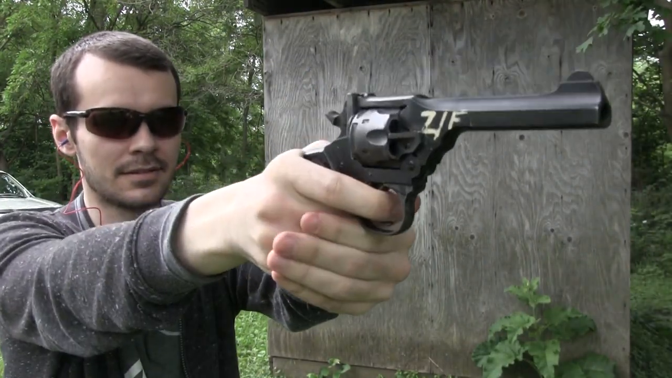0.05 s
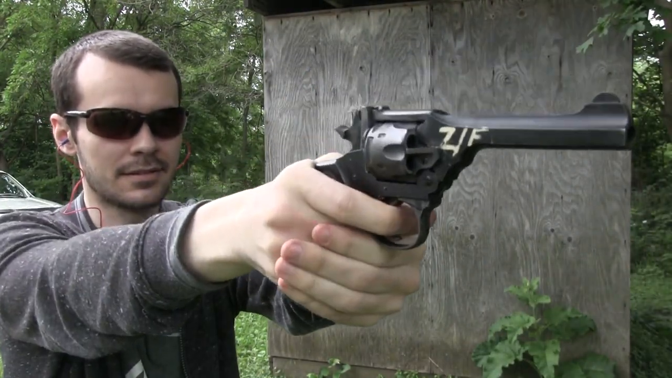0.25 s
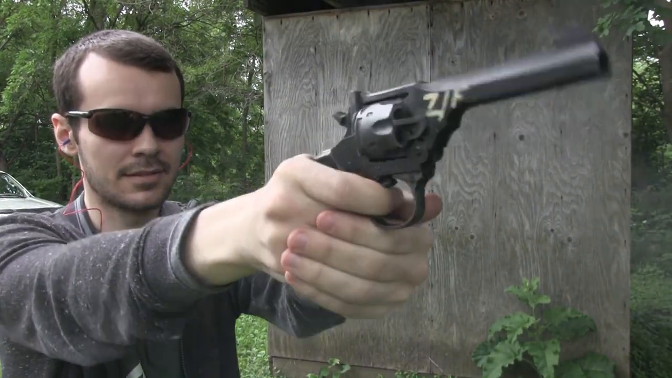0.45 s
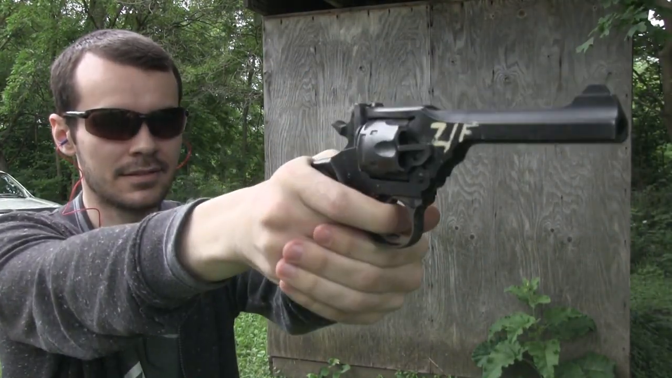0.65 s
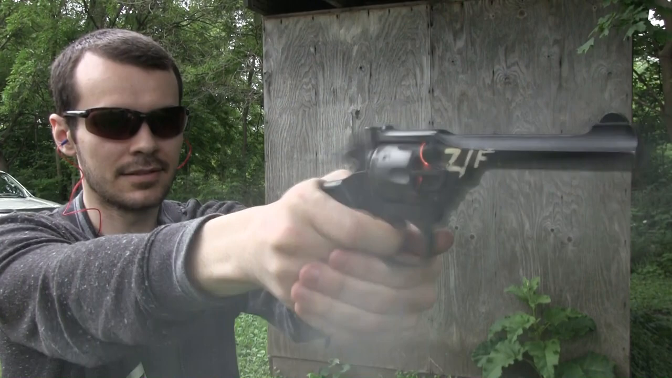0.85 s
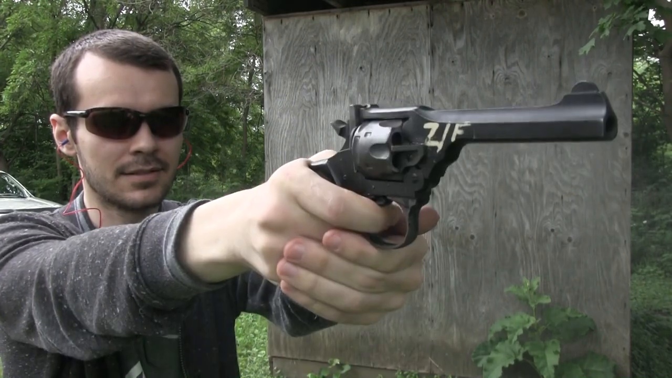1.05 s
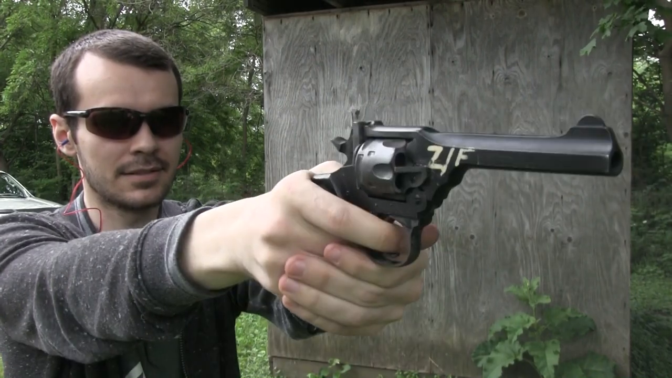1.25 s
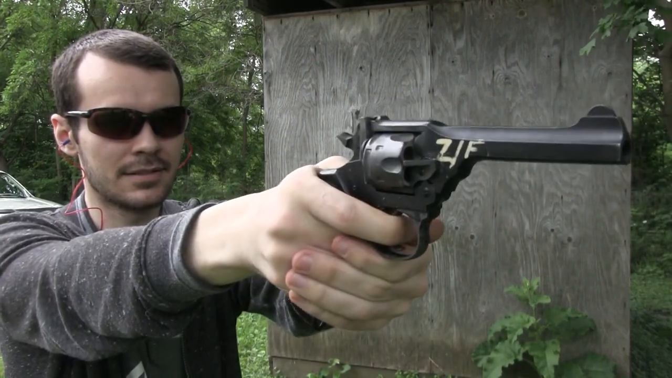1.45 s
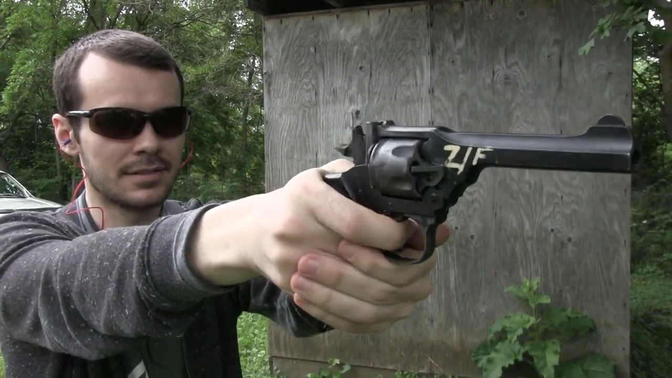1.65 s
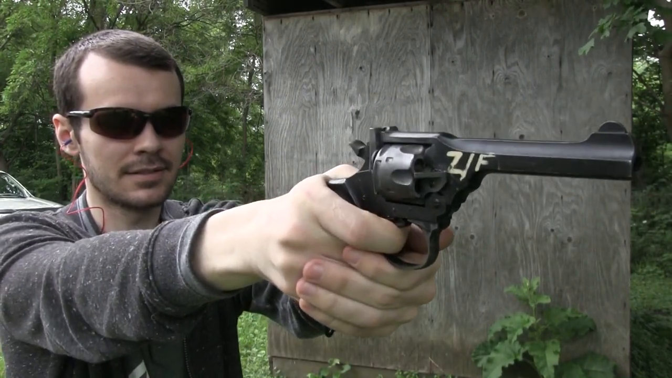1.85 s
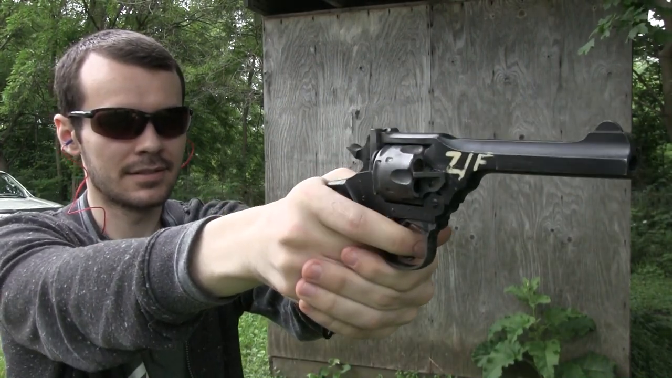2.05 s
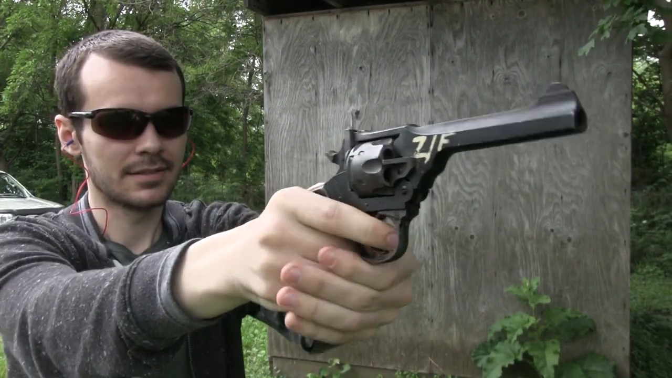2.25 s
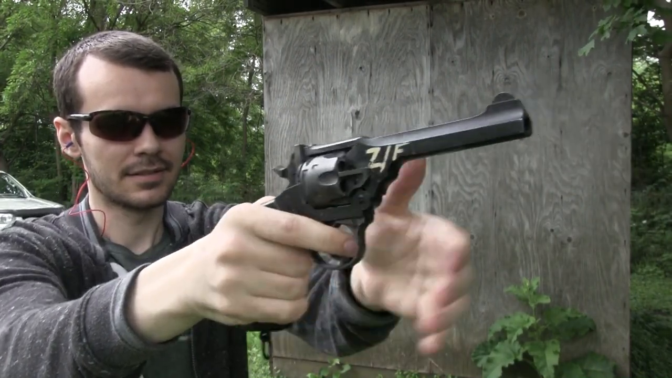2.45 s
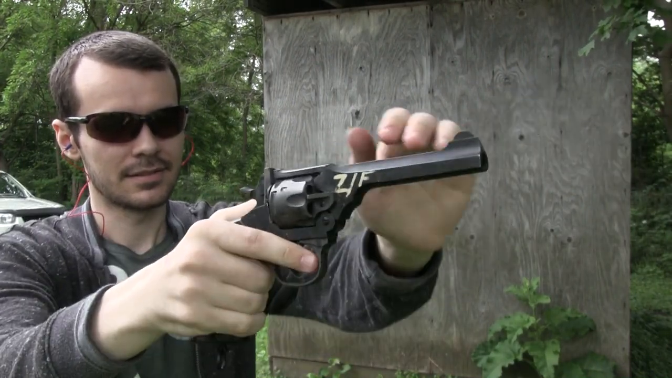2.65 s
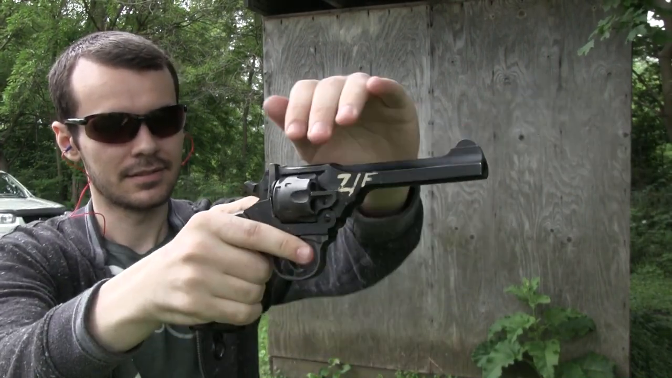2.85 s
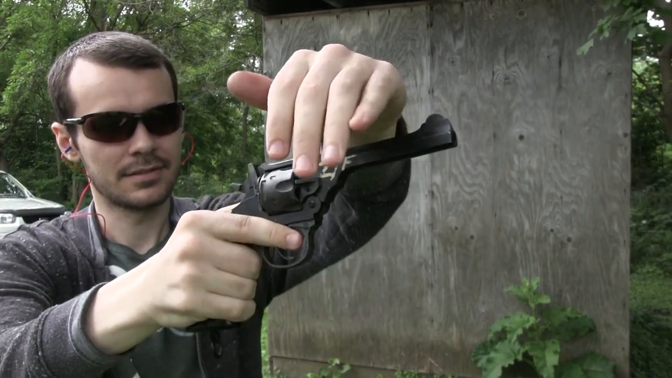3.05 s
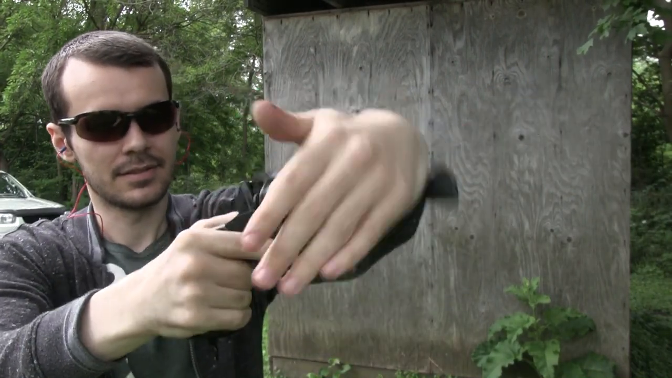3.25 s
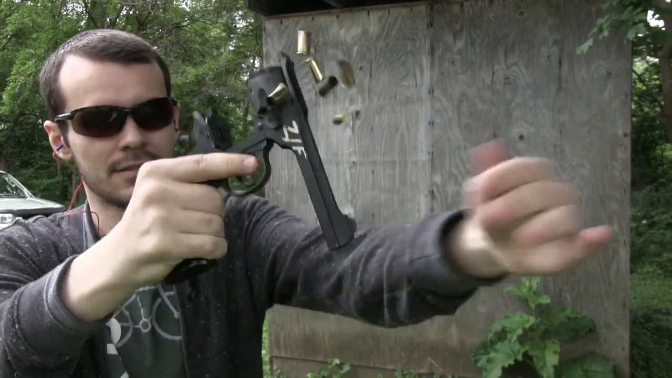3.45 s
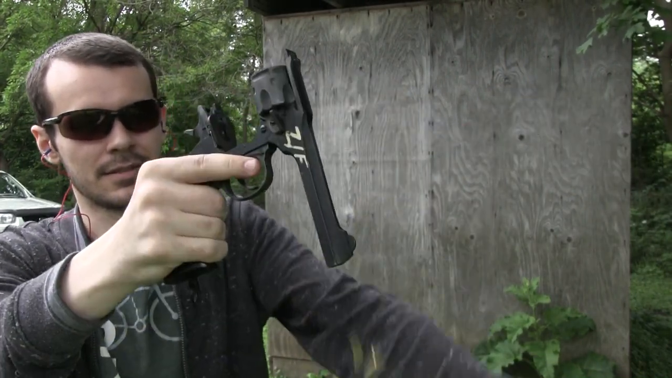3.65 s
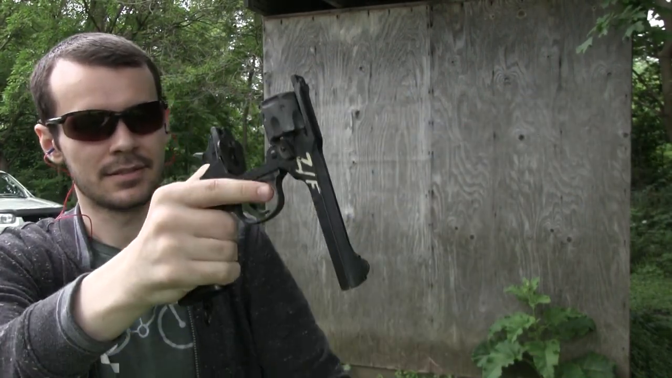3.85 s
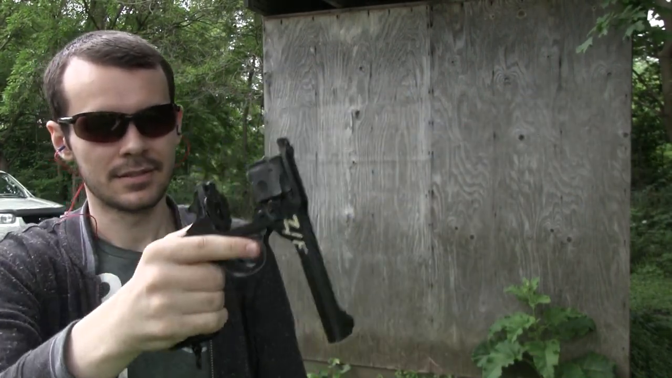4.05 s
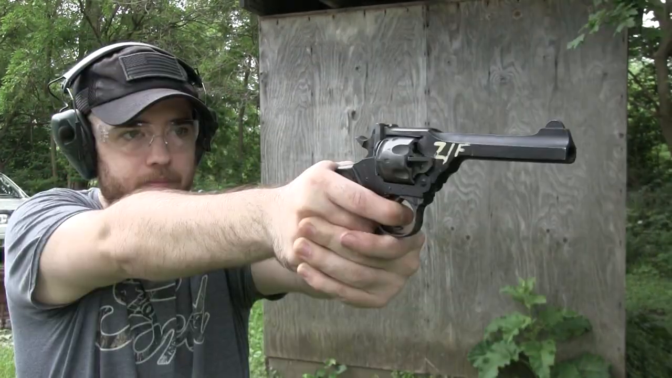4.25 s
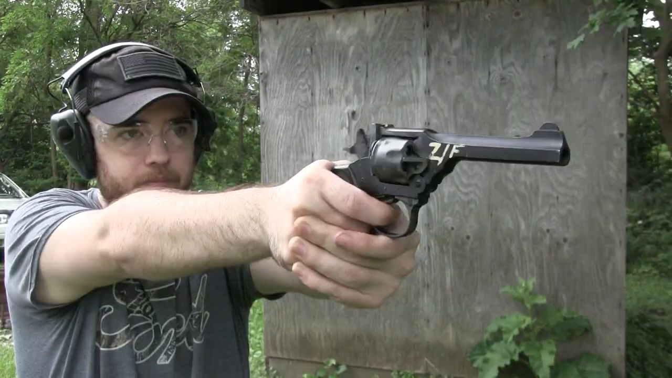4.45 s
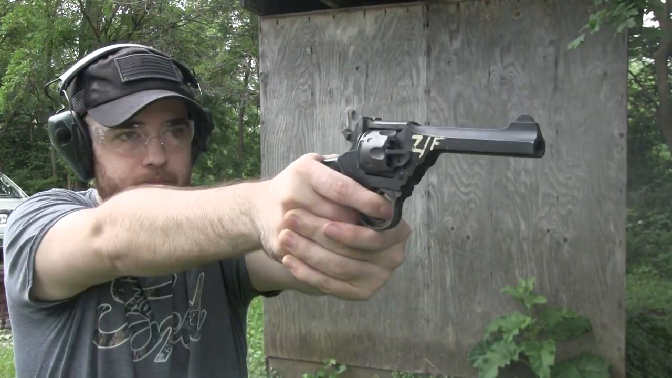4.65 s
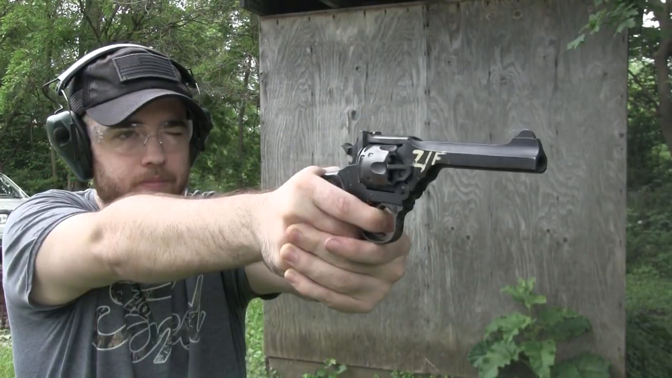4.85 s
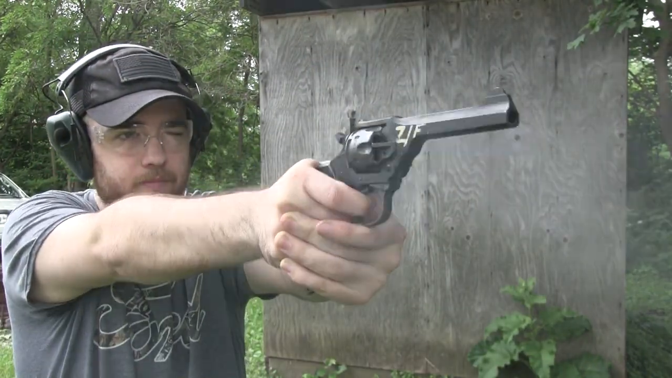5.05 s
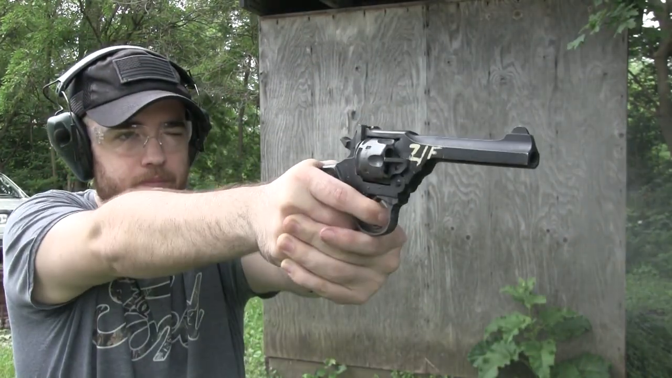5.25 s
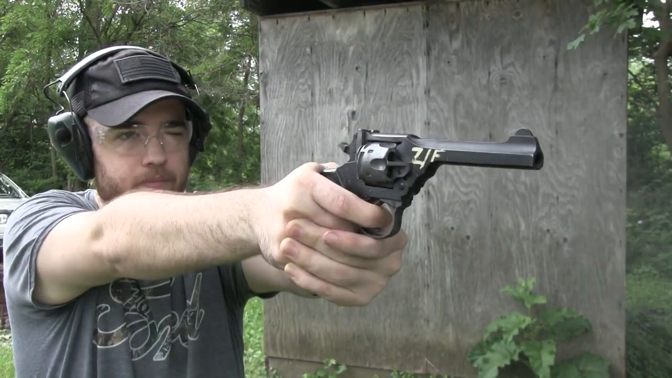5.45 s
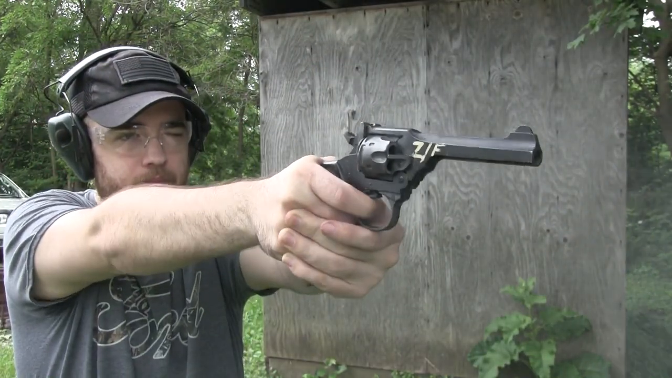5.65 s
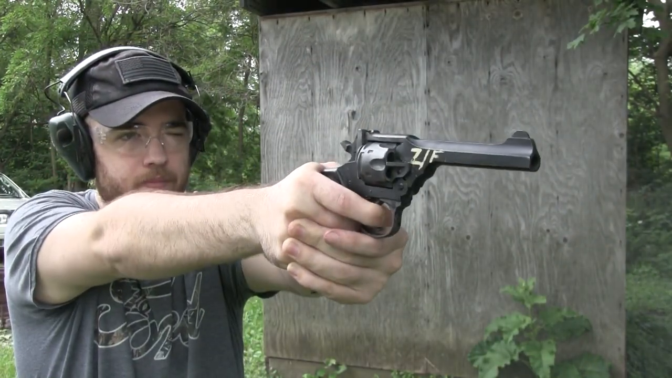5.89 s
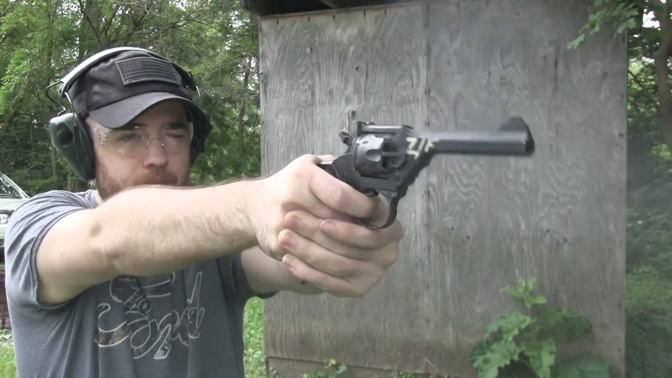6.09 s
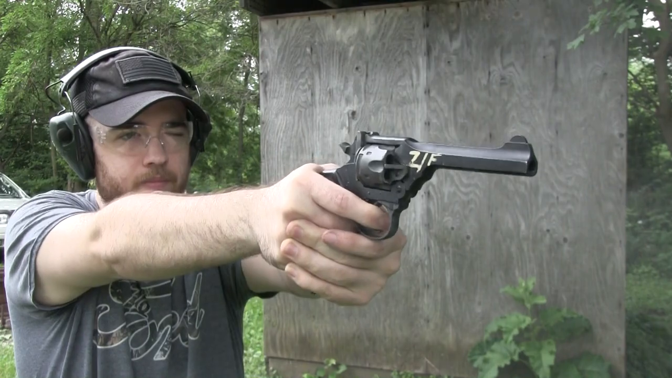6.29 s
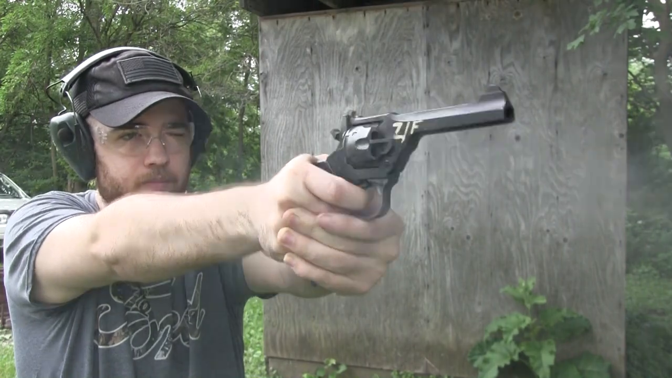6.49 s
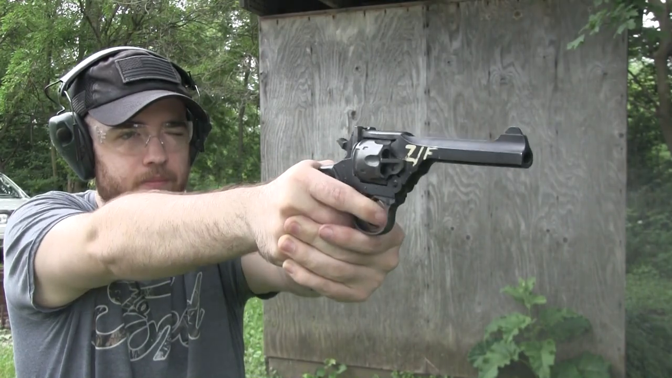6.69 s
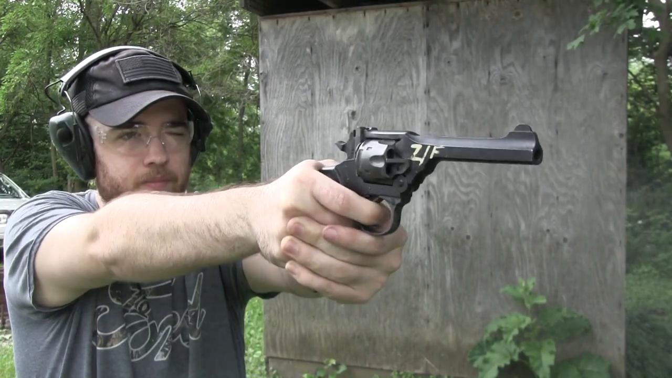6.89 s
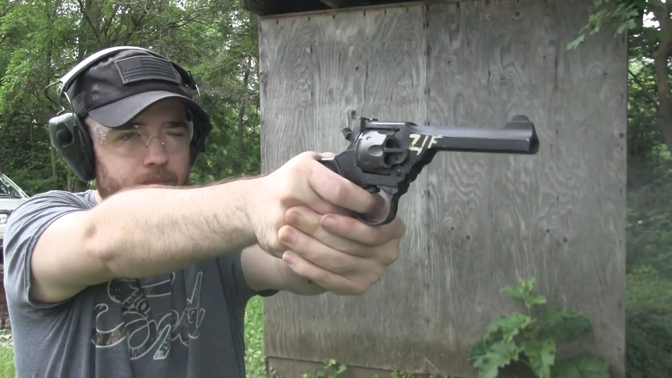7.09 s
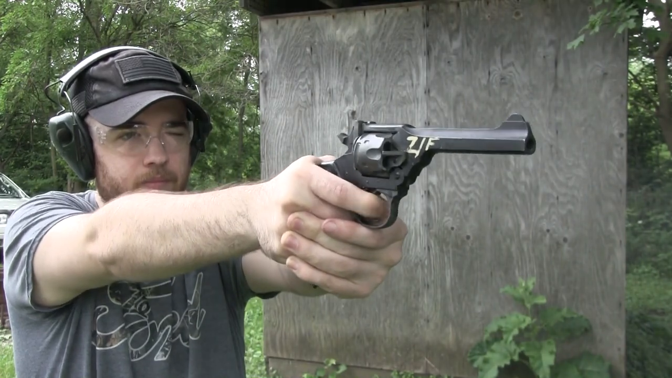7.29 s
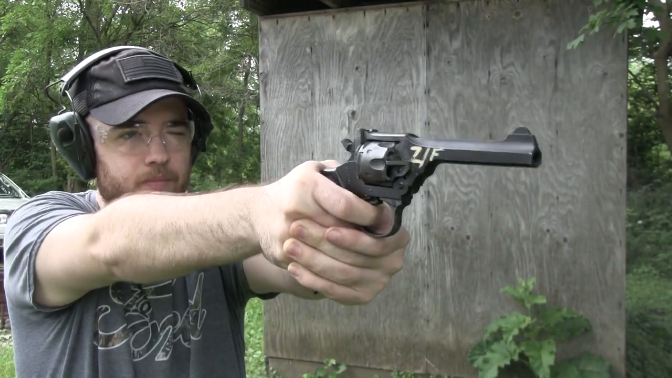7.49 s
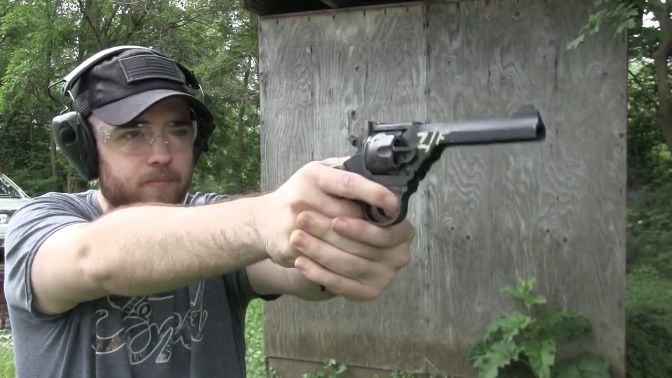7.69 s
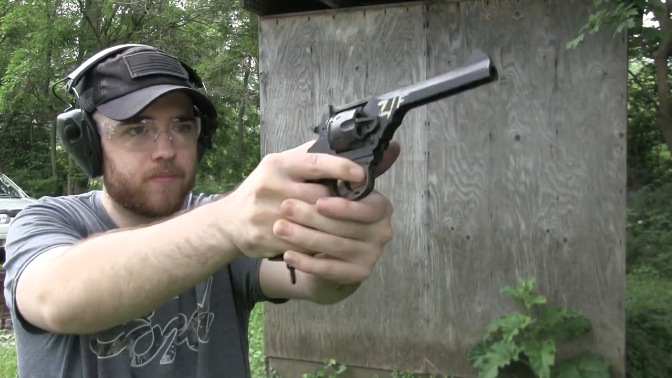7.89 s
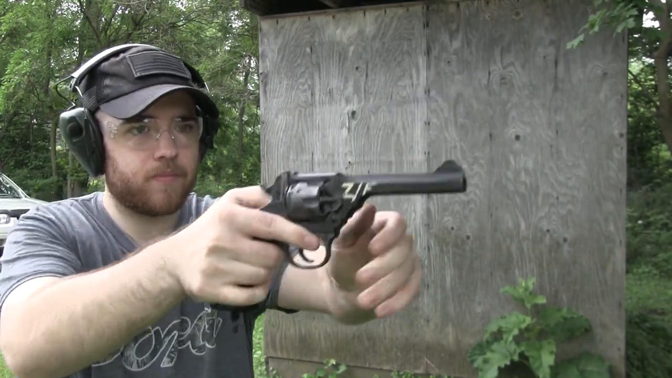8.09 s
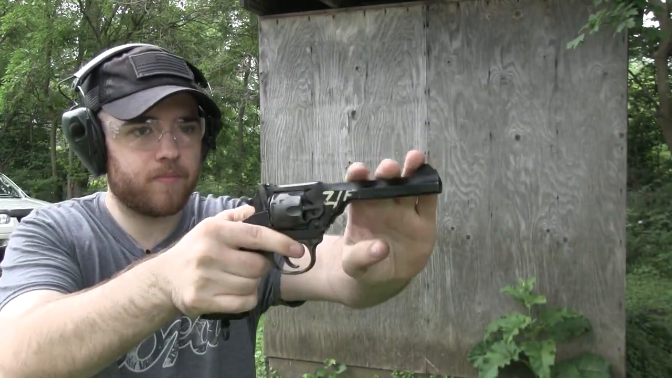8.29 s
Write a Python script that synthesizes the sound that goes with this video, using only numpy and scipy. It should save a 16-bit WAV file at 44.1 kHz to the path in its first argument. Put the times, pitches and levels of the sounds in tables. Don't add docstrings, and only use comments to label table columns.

```python
import sys
import numpy as np
from scipy import signal
from scipy.fft import rfft, irfft
from scipy.io import wavfile
from scipy.ndimage import uniform_filter1d

SR = 44100
rng = np.random.default_rng(int(sys.argv[2]) if len(sys.argv) > 2 else 0)


def how_loud(loudness_db):
    steps = np.asarray(loudness_db, float) / 20
    return 10 ** steps


def master(y):
    cut = np.clip(np.atleast_2d(y).T, -1, 1)
    pcm = np.round(cut * 32767)
    wavfile.write(sys.argv[1], SR, pcm.astype(np.int16))


N = 367345
LEAD_S = .005


def at_hz(points, hz):
    f, v = np.transpose(points)
    return np.interp(np.log(hz), np.log(f), v)


def bandpass(x, order, low_hz, high_hz):
    return signal.sosfilt(signal.butter(order, [low_hz, high_hz], "band", fs=SR, output="sos"), x)


def bands(white):
    edges_hz = 60 * 2 ** np.arange(0, 8.4, .5)
    for k, (low_hz, high_hz) in enumerate(zip(edges_hz, edges_hz[1:])):
        yield np.sqrt(low_hz * high_hz), bandpass(white[k % 2], 2, low_hz, high_hz)


def shaped(spectrum, size):
    hz = np.maximum(np.arange(size // 2 + 1) * SR / size, 10)
    noise = irfft(rfft(rng.standard_normal(size)) * how_loud(at_hz(spectrum, hz)), size)
    return noise / noise.std()


def ringing(hz, t60_s, length_s):
    t = np.arange(round(length_s * SR)) / SR
    return np.sin(2 * np.pi * hz * t) * how_loud(-60 * t / t60_s)


def add(out, sound, start_s):
    i = round(start_s * SR)
    part = sound[max(-i, 0):max(len(out) - i, 0)]
    out[max(i, 0):max(i, 0) + len(part)] += part


def air():
    # frequency in Hz, level in dB per Hz.
    spectrum = [(12, -38), (20, -3), (103, -5), (200, -18), (421, -21.5), (1500, -24.5), (14800, -28.5),
                (17000, -29.5)]
    return how_loud(-66.5) * shaped(spectrum, size=N)


def fall(hz, t, clumped, burst, woods, leaves, jets, front_s, rise_s, valley_db, valley_t60_s, far_db):
    # frequency in Hz, level in dB.
    valley_colour = [(220, -30), (330, -24), (480, -6), (900, -1), (2000, 2.5), (2500, -11.5), (4000, -24),
                     (14000, -58.5)]
    # frequency in Hz, level in dB.
    jet_colour = [(220, -29), (1500, -10), (4500, 2.5), (14000, -6.5)]
    jet_t60_s, far_t60_s, clump_db = .008, 4.5, 3

    db, held_s, t60_s = (at_hz([(row[0], row[k]) for row in burst], hz) for k in (1, 2, 3))
    blast = how_loud(db - 60 * np.maximum(t - front_s - held_s, 0) / t60_s)

    colour_db, drift_db = (at_hz([(row[0], row[k]) for row in leaves], hz) for k in (1, 2))
    trunks = how_loud(np.interp(t, *np.transpose(woods)) + colour_db + drift_db * t)

    near_slopes = how_loud(valley_db + clump_db * clumped - 60 * t / valley_t60_s)
    far_slopes = how_loud(far_db - 60 * t / far_t60_s)
    valley = how_loud(at_hz(valley_colour, hz)) * (near_slopes + far_slopes)

    gate = how_loud(40 * np.minimum((t - front_s) / rise_s, 0))
    jet = 0
    for s, jet_db in jets:
        jet = jet + (t > s) * how_loud(jet_db + at_hz(jet_colour, hz) - 60 * (t - s) / jet_t60_s)
    return np.sqrt(gate ** 2 * (blast ** 2 + trunks ** 2 + valley ** 2) + jet ** 2)


def clumps(banks, white, t):
    out = np.zeros_like(white)
    for delay_s, db, length_s, hz in banks:
        band = bandpass(white[:, t < delay_s + length_s], 3, hz / 1.42, hz * 1.428)
        swell = band[:, -round(2 * length_s * SR):]
        end, size = band.shape[1], swell.shape[1]
        out[:, end - size:end] += how_loud(db) * swell / band.std() * np.hanning(size)
    return out


def shots(events, slaps, banks, alike, scatter_db, slap_db, push_db, push_hz, **stand):
    # frequency in Hz, level in dB per Hz.
    blast = [(53, -27), (90, -5.5), (427, -8.5), (1900, -14), (3430, -10), (5090, -10.5), (12800, -25),
             (17000, -48.5)]
    air_loss_hz = 14400
    t = np.arange(round(2.2 * SR)) / SR - LEAD_S

    white = np.sqrt(alike) * rng.standard_normal((2, 1, len(t)))
    white = white + np.sqrt(1 - alike) * rng.standard_normal((2, len(events), len(t)))
    clumped = uniform_filter1d(uniform_filter1d(rng.standard_normal(len(t)), size=250), size=250)
    clumped /= clumped.std()

    tails = 0
    for hz, band in bands(white):
        tails = tails + band * how_loud(scatter_db + at_hz(blast, hz)) * fall(hz, t, clumped, **stand)
    tails = signal.sosfilt(signal.butter(2, air_loss_hz, fs=SR, output="sos"), tails)
    tails = tails + clumps(banks, white[0], t)

    fronts = np.zeros(len(t))
    for delay_s, db, length_ms, sign in slaps:
        u = np.linspace(-1, 1, max(round(length_ms * SR / 1000), 4))
        add(fronts, sign * how_loud(db + slap_db) * -np.sin(np.pi * u), delay_s + LEAD_S)
    add(fronts, how_loud(push_db) * ringing(push_hz, .11, .3), .004 + LEAD_S)

    out = np.zeros(N)
    for (s, db), tail in zip(events, tails):
        add(out, how_loud(db) * (tail + fronts), s - LEAD_S)
    return out


def first_string():
    # time in seconds, peak in dB.
    events = [
        (-.35, -5),
        (.484, -6),
        (.9525, -6),
    ]
    # delay in seconds, level in dB, length in ms, signed gain.
    slaps = [(-.0006, 3.5, 1.3, 0.68), (-.0002, -1.5, 2.1, -1), (.0042, -3.5, 1.4, 1),
             (0.0203, -4, 1.3, -1), (0.0221, 3, 1.7, 1)]
    # delay in seconds, level in dB, length in seconds, centre in Hz.
    banks = [(0.113, -19, .012, 1610), (0.146, -21.5, 0.034, 1440), (0.193, -34, 0.016, 716),
             (.3, -41, 0.018, 1630), (0.348, -32, 0.043, 1595), (.54, -40.5, 0.076, 750),
             (0.553, -36.5, .08, 1500), (1.06, -58, 0.15, 1600)]
    # frequency in Hz, level in dB, hold in seconds, T60 in seconds.
    burst = [(100, 4.5, 0.013, .09), (300, -0.5, .012, .09), (1500, 4, .023, .13), (4500, -4.5, .012, .2),
             (14000, 0, .022, .1)]
    # delay in seconds, scatter level in dB.
    woods = [(0, -11.5), (.085, -10), (.151, -8.5), (.198, -15), (.3, -24.5), (.39, -31.5), (.65, -42),
             (1.2, -67.5), (2.2, -83)]
    # frequency in Hz, level in dB, drift in dB per second.
    leaves = [(220, -12, 15.5), (1500, 4, 0.3), (4500, -1.06, 1.6), (9000, 3, -14), (14000, -2.5, -20)]
    # delay in seconds, level in dB.
    jets = [(-.0003, -10)]
    return shots(events, slaps, banks, alike=0.4, scatter_db=6.0, slap_db=-6.0, push_db=-6, push_hz=59.3,
                 burst=burst, woods=woods, leaves=leaves, jets=jets, front_s=-.0003, rise_s=0.00044,
                 valley_db=-12.5, valley_t60_s=1.69, far_db=-31.5)


def ticks():
    # time in seconds, peak in dB, centre in Hz.
    trigger = [(.453, -48, 5040), (0.471, -35, 9500), (.946, -44, 8000), (1.805, -40, 10000),
               (2.1205, -49, 10900), (4.525, -55, 2290), (7.507, -22, 5200), (7.93, -58, 8000),
               (8.01, -58, 10000), (8.065, -53, 5000), (8.092, -57, 4200), (8.195, -54, 10700)]
    reload = [(3.052, -51.5, 6400), (3.341, -42.5, 6350), (3.341, -52, 2000), (3.367, -43, 1200),
              (3.368, -44, 5000), (3.385, -48, 2200), (3.4235, -35, 5000), (3.436, -43, 4500),
              (3.449, -45, 5000), (3.456, -49, 2120), (3.457, -46, 4500), (3.465, -55, 4800),
              (3.472, -55, 4600), (3.481, -54, 5000), (3.5, -52, 4800), (3.489, -54, 2800),
              (3.49, -48, 9000), (3.512, -45, 11000), (3.917, -51.5, 2600), (4.075, -54, 2500),
              (4.096, -50, 2500), (4.122, -48.5, 2500)]
    bounces = [(1.8152, -28, 9000), (1.8175, -35, 6000), (1.8315, -29, 8000), (2.1255, -40, 9500),
               (2.1285, -50, 9000), (2.144, -52, 6000), (3.4325, -41, 6000), (7.493, -37.5, 2200),
               (7.5025, -24, 9000), (7.506, -36, 9000), (7.696, -33, 8950), (7.701, -47, 7950),
               (.479, -46, 5980)]
    out, t = np.zeros(N), np.arange(round(0.09 * SR)) / SR
    for s, db, hz in trigger + reload + bounces:
        rattle = shaped([(hz / 4, -16), (hz, 0), (hz * 2.5, -16)], size=len(t))
        add(out, how_loud(db - 4 - 60 * t / 0.0098) * rattle, s)
    return out


def clacks():
    # time in seconds, peak in dB, push in dB, body tone in Hz, sharpness 0-1.
    blows = [
        (1.8098, -20.5, -9, 9800, 1),
        (2.1227, -33.5, -6, 6100, 0),
        (3.427, -23, -9.5, 8440, 0.64),
        (7.4957, -12.5, -16, 2820, 0.3),
        (7.499, -10.5, -18, 5120, 1),
        (7.6995, -22.5, -13.5, 2820, 0.2),
    ]
    # frequency in Hz, level in dB per Hz.
    steel = [(400, -39), (1000, 4), (2000, -3.5), (3000, 0), (5000, 0.5), (10000, -3.5), (15000, -13),
             (17000, -23)]
    # frequency in Hz, level in dB per Hz.
    twigs = [(1000, -24), (2500, -7), (5000, 0), (9500, -1.5), (13000, -6.5), (17000, -6.5)]
    move_s, hedge_db, suction_db = 3.0, 7.5, -8
    out, t = np.zeros(N), np.arange(round(.4 * SR)) / SR
    for s, db, push_db, body_hz, sharp in blows:
        shape = np.minimum(t / .001, 1) ** 2 * how_loud(-60 * np.maximum(t - .001, 0) / .008)
        body = np.sin(2 * np.pi * body_hz * t)
        sound = shape * (how_loud(-7.5) * shaped(steel, size=len(t)) + how_loud(-5) * body)

        near_leaves = how_loud(-17 - 60 * t / 0.032)
        hedge = how_loud(-32 + hedge_db * (s < move_s) - 60 * t / .33)
        sound += shaped(twigs, size=len(t)) * (near_leaves + hedge)

        add(sound, -sharp * how_loud(suction_db) * np.hanning(40), .0005)
        push = 2.15 * np.exp(-t / .007) - .67 * np.exp(-t / .026) - 1.48 * np.exp(-t / .0008)
        add(sound, sharp * how_loud(push_db) * push, .001)
        sound += (1 - sharp) * how_loud(push_db) * ringing(31.5, 0.14, .4)[:len(t)]
        add(out, how_loud(db) * sound, s)
    return out


def bird():
    # start from slur in seconds, length in seconds, start in Hz, end in Hz, level in dB.
    phrase = [
        (-.055, .09, 5450, 5300, -3),
        (0, .033, 5350, 6460, 2),
        (.05, 0.061, 4380, 4560, -3),
    ]
    # slur time in seconds, level in dB.
    phrases = [(3.265, -69), (3.59, -71.5), (3.94, -70)]
    # start in seconds, length in seconds, pitch in Hz, level in dB.
    loose = [(2.69, .04, 4400, -82), (2.701, .027, 3500, -84), (3.093, 0.033, 4700, -71),
             (3.65, 0.054, 2320, -75), (3.773, .04, 4150, -70), (3.82, .13, 3420, -73),
             (3.997, .045, 3600, -81)]
    sag, buzz = .05, .24
    dry_gain, wet_db, wet_t60_s = .5, -29.5, .55

    calls = []
    for s, db in phrases:
        for lag_s, length_s, start_hz, end_hz, note_db in phrase:
            calls.append((s + lag_s, length_s, start_hz, end_hz, db + note_db))
    for s, length_s, hz, db in loose:
        calls.append((s, length_s, hz * (1 + sag / 2), hz * (1 - sag / 2), db))

    out = np.zeros(N)
    for s, length_s, start_hz, end_hz, db in calls:
        size = round(length_s * SR)
        wander = uniform_filter1d(rng.standard_normal(8000), size=150)[:size]
        hz = np.linspace(start_hz, end_hz, size) * (1 + buzz * wander)
        whistle = np.sin(2 * np.pi * np.cumsum(hz) / SR)
        add(out, how_loud(db) * np.hanning(size) ** .5 * whistle, s)
    t = np.arange(round(.3 * SR)) / SR
    smear = rng.standard_normal(len(t)) * how_loud(wet_db - 60 * t / wet_t60_s)
    return dry_gain * out + signal.fftconvolve(out, smear)[:N]


def pings():
    # time in seconds, level in dB, mode in Hz, T60 in seconds.
    modes = [(3.285, -68, 14100, .15), (3.285, -70, 9600, .1), (3.37, -53, 2520, .04),
             (3.428, -53, 9830, 0.36), (3.428, -45, 9860, 0.33), (3.432, -58, 14150, .15),
             (3.449, -52, 4600, .05), (3.49, -51, 9750, 0.29), (3.49, -52.5, 2100, 0.042),
             (3.49, -54, 11600, .04), (7.505, -43, 14100, .2), (7.5, -40, 9400, .15)]
    out = np.zeros(N)
    for s, db, hz, t60_s in modes:
        add(out, how_loud(db) * ringing(hz, t60_s, .4), s)
    return out


def thuds():
    # time in seconds, peak in dB, low mode in Hz.
    landings = [(4.0754, -44, 412), (4.0957, -45, 780), (4.1037, -46, 412), (4.1165, -52, 980),
                (4.123, -44, 460), (4.143, -57, 369)]
    out = np.zeros(N)
    for s, db, hz in landings:
        knock = ringing(hz, 0.018, .06) + how_loud(-8) * ringing(2.0 * hz, 0.008, .06)
        add(out, how_loud(db) * knock, s)
    return out


def second_string():
    events = [(4.5593, -6.5), (5.1125, -6.5), (5.6104, -6.5), (6.0872, -6.5), (6.5401, -6.5), (7.03, -6.5)]
    slaps = [(.0018, -3, 5.1, -0.51), (.0037, 2.5, 1.7, 0.7), (.0052, -1, 1.6, 0.24),
             (.0095, -3, 1.62, -0.67), (.022, -6.5, 0.77, -1.9), (.097, -10.5, 1.54, 1),
             (0.241, -18, 0.38, 1), (0.241, -21.5, 0.41, 1)]
    banks = [(.076, -15.5, 0.0041, 733), (0.098, -20.5, 0.0084, 695), (0.254, -38, 0.014, 690),
             (.272, -27, 0.0034, 1580), (0.288, -28, .006, 1500), (0.314, -32.5, 0.013, 1720),
             (0.347, -28, 0.029, 1520), (0.352, -33, 0.024, 715), (0.409, -28, 0.0013, 1400),
             (.435, -39, 0.0027, 1100), (.55, -35.5, 0.087, 750), (0.552, -35, 0.13, 1436),
             (.69, -36.5, 0.028, 790), (.75, -54, 0.058, 1320), (1.07, -59.5, 0.11, 1140)]
    burst = [(220, 6.5, 0.0088, 0.16), (1500, 7, 0.037, 0.24), (4500, 0, .022, 0.34),
             (14000, -1, 0.047, .4)]
    woods = [(0, -1.5), (.083, -5.5), (.151, -3), (.198, -8.5), (.3, -20), (.38, -24), (.55, -30),
             (.7, -41), (2.2, -88)]
    leaves = [(217, -11, 16.5), (1500, 3.5, 4.5), (4500, -0.46, 1.5), (9000, 3, -11), (14000, 5.5, -48)]
    jets = [(-.004, -9.5), (-.0017, 7)]
    return shots(events, slaps, banks, alike=0.36, scatter_db=1.0, slap_db=1.0, push_db=-7.0, push_hz=44.5,
                 burst=burst, woods=woods, leaves=leaves, jets=jets, front_s=0.0022, rise_s=.005,
                 valley_db=-5.5, valley_t60_s=1.98, far_db=-35.5)


def scene():
    handling = ticks() + clacks() + pings() + thuds()
    mix = air() + first_string() + handling + bird() + second_string()
    return mix[None]


def low_pass(x):
    return signal.sosfilt(signal.butter(12, 17830, fs=SR, output="sos"), x)


def record(dry):
    mic_cut_hz = 16900
    rounded = 0.42 * np.tanh(dry / 0.48)
    finished = signal.sosfilt(signal.cheby2(8, 32, mic_cut_hz, fs=SR, output="sos"), rounded)
    return low_pass(finished)


dry = scene()
out = record(dry)
master(out)
```